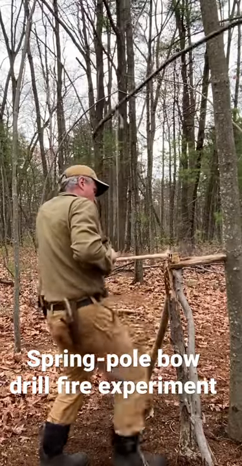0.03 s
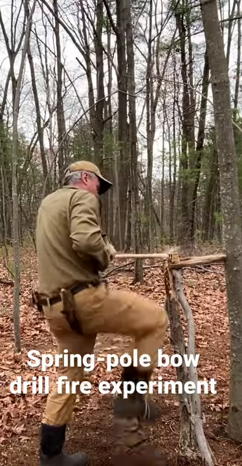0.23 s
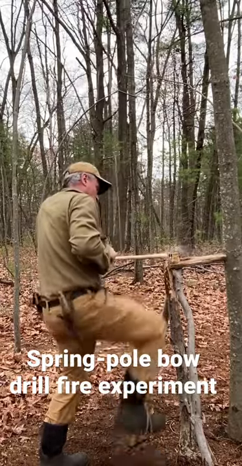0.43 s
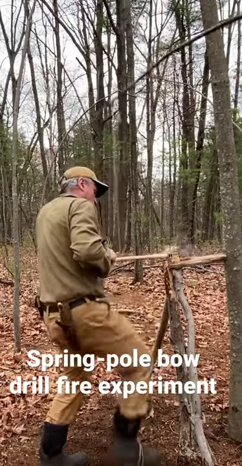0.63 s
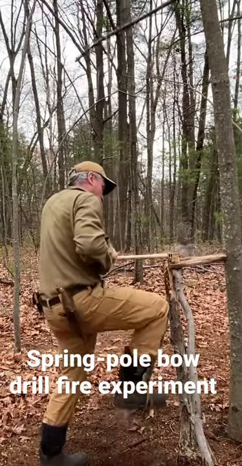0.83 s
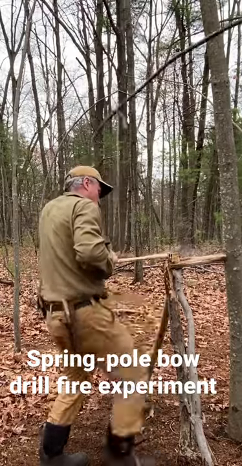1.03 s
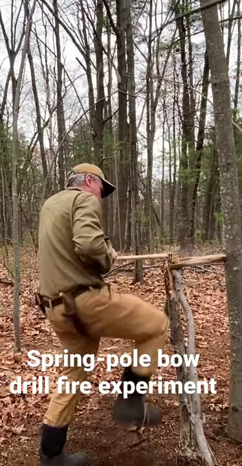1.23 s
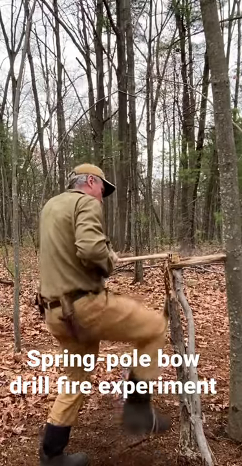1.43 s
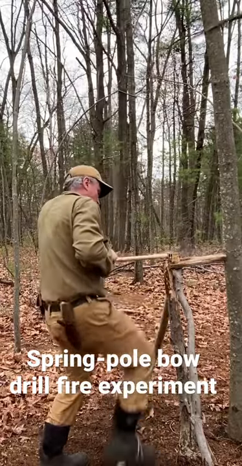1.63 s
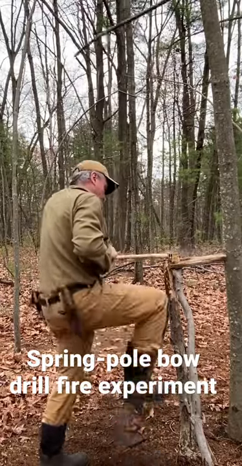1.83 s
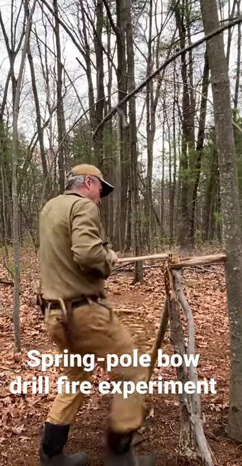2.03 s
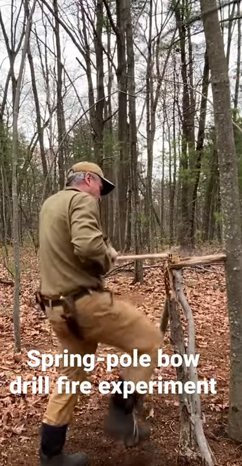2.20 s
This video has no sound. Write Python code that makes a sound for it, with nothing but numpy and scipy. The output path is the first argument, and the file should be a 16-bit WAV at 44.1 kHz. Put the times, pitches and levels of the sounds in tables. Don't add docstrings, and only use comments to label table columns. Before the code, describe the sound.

Wooden squeaks from a foot-driven spindle: two rough, chirping ones at 0.1-0.22 and 0.37-0.48 s, then loud, higher down-stroke squeaks near 0.93, 1.44 and 1.94 s, with weaker return squeaks near 0.66, 1.15, 1.65 and 2.16 s. Dry rubbing and sharp cord ticks accompany them; dull boot thuds fall near 0.47, 0.96, 1.47 and 1.98 s. Underneath, a sagging distant hum, low rumble and swelling traffic wash; slight woodland scatter.

```python
import sys
import numpy as np
from scipy import signal
from scipy.fft import rfft, irfft
from scipy.io import wavfile
from scipy.ndimage import uniform_filter1d

SR = 44100
rng = np.random.default_rng(int(sys.argv[2]) if len(sys.argv) > 2 else 0)


def unload_wav(signal):
    wavfile.write(
        sys.argv[1],
        SR,
        np.round(np.clip(np.atleast_2d(signal).T, -1, 1) * 32767).astype(np.int16),
    )


def ratio(d):
    e = np.asarray(d, float) / 20
    return 10 ** e


N = 99886

# [f/Hz, phase/rad]
PORTS = [(7200, -.5), (8800, -1.9), (9300, -3.2), (10400, -5.9), (11900, -6.9), (12900, -9.2),
         (14100, -10.1), (14800, -12.5)]


def read(points, hz):
    f, value = np.transpose(points)
    return np.interp(np.log(hz + 1), np.log(f + 1), value)


def curve(points, t):
    return np.interp(t, *np.transpose(points))


def evened(x):
    return x / np.sqrt(np.mean(x ** 2) + 1e-20)


def drift(n, seconds):
    k = max(round(seconds * SR), 2)
    smooth = uniform_filter1d(uniform_filter1d(rng.standard_normal(n), k), k)
    return smooth * np.sqrt(1.31 * k)


def add(mix, s, sound):
    part = mix[round(s * SR):][:len(sound)]
    part += sound[:len(part)]


def colour(x, points):
    hz = np.fft.rfftfreq(len(x), 1 / SR)
    gain = ratio(read(points, hz)) * (hz < points[-1][0] * 1.06)
    return irfft(rfft(x) * gain, len(x))


def hum():
    # [f/Hz, width/Hz, level/dB]
    tones = [
        (65.67, 18, -8.5),
        (132.1, 1.6, 0),
        (151.6, 7.4, -8),
        (186.7, 12, -12),
    ]
    # [t/s, share of the starting pitch]
    sag = [(0, 1.0), (.42, 1.0), (.8, .984), (1.3, .971), (1.7, .968), (2.26, .97)]
    # [t/s, level/dB]
    fade = [(0, -34), (.1, -31), (.3, -42), (.47, -35), (.65, -35.5), (.8, -50), (1.0, -38), (1.5, -37.5),
            (1.68, -40), (1.9, -35.5), (2.1, -42), (2.26, -47)]
    t, out = np.arange(N) / SR, np.zeros(N)
    turns = np.cumsum(curve(sag, t)) / SR
    for hz, width, db in tones:
        waver = 2.6 + drift(N, 0.31 / width) + 1j * drift(N, 0.1 / width)
        out += ratio(db) * evened((waver * np.exp(2j * np.pi * hz * turns)).real)
    out = out * ratio(curve(fade, t))
    return np.array([out * ratio(0.5), np.roll(out, -40) * ratio(0.5)])


def air(points, db, frame, patchy_db):
    # [f/Hz, correlation]
    same_curve = [(60, .98), (200, .95), (320, .6), (500, .45), (1100, .35), (1700, .1), (8600, .2),
                  (9200, .97)]
    # [f/Hz, phase/rad]
    lead = [(40, -.3), (90, -.5), (130, -.8), (250, -.85), (400, -1.3), (600, -2.3), (1300, -2.3)]
    # [f/Hz, left minus right/dB]
    tilt = [(60, 1.0), (240, 3), (950, -1), (3770, 2), (15000, -1)]
    hop, hz = frame // 4, np.fft.rfftfreq(frame, 1 / SR)
    a, b, c, d, patches = rng.standard_normal((N // hop + 6, len(hz), 5)).T
    patches = evened(uniform_filter1d(uniform_filter1d(patches, 12, 0), 12, 1))
    same = np.clip(read(same_curve, hz), -1, 1)[:, None]
    left, other = a + 1j * b, c + 1j * d
    phase = np.where(hz < 5000, read(lead, hz), read(PORTS, hz))[:, None]
    right = (same * left + np.sqrt(1 - same ** 2) * other) * np.exp(-1j * phase)
    z = np.array([left, right * ratio(-read(tilt, hz))[:, None]])
    inside = (hz >= points[0][0]) & (hz <= points[-1][0])
    z *= ratio(read(points, hz)[:, None] + patchy_db * patches) * inside[:, None]
    sound = signal.istft(z, nperseg=frame, noverlap=frame - hop)[1][:, :N]
    return ratio(db) * evened(sound)


def rumble():
    # [f/Hz, level/dB]
    low_spectrum = [(22, -62), (40, -28), (55, -2.5), (90, -1.5), (115, -11), (170, -9.5), (205, -19),
                    (300, -20)]
    return air(low_spectrum, -39, 4096, patchy_db=1.0)


def traffic_wash():
    # [f/Hz, level/dB]
    wash_spectrum = [(180, -91), (300, -9.5), (831, -1), (1440, -3), (1600, -4.5), (2080, -6),
                     (7550, -29.5), (15000, -59), (16300, -63)]
    # [t/s, level/dB]
    swell = [(0, -1), (.6, 0.5), (1.2, 0), (1.75, 1), (2.05, 1.5), (2.26, 3)]
    return ratio(curve(swell, np.arange(N) / SR)) * air(wash_spectrum, -36.5, 1024, patchy_db=1.9)


def rubbing():
    # [middle t/s, length/s, level/dB]
    strokes = [
        (0.132, .24, -63.5),
        (0.428, 0.19, -62.5),
        (0.662, 0.31, -67),
        (0.92, 0.16, -60.5),
        (1.152, 0.19, -65),
        (1.431, 0.18, -61),
        (1.63, 0.12, -63),
        (1.94, 0.14, -59.5),
        (2.15, 0.17, -63.5),
    ]
    # [f/Hz, level/dB]
    rub_spectrum = [(2000, -46), (5000, 0), (8300, -1.5), (9500, 5.5), (10800, -0.5), (13000, -5.5),
                    (15000, -9), (16000, -24)]
    t, speed = np.arange(N) / SR, np.zeros(N)
    for s, length, db in strokes:
        speed += ratio(db) * np.cos(np.pi * np.clip((t - s) / length, -.5, .5)) ** 1.28
    grit = rng.standard_normal(N) * ratio(2.8 * drift(N, 0.0025) + 0.5 * drift(N, 0.019))
    return speed * evened(colour(grit, rub_spectrum)) * 2.16


def cord_ticks():
    # [t/s, peak level/dB]
    tick_times = [(.0473, -46), (0.1143, -39.5), (0.251, -40), (0.2698, -50), (.3651, -48), (0.612, -35),
                  (0.6314, -51), (0.6792, -36), (.8545, -48), (0.939, -28.5), (1.0484, -36),
                  (1.0493, -22.5), (1.086, -37), (1.1348, -40), (1.1762, -33.5), (1.3483, -45),
                  (1.439, -32), (1.564, -27.5), (1.567, -29), (1.6047, -47), (1.6192, -42), (1.682, -36),
                  (1.685, -39), (1.8387, -45), (1.9091, -49), (1.927, -43), (2.0827, -51), (2.112, -31)]
    # [f/Hz, level/dB]
    tick_spectrum = [(3000, -30), (5000, -23), (7500, -24), (10800, -5), (13000, -11), (16000, -20)]
    length_s, tail_db, tail_t60_s = 0.0005, -19, .022
    ticks, t = np.zeros(N), np.arange(2048) / SR
    after = t - .004
    shape = np.exp(-(after / length_s) ** 2 * 4)
    shape = shape + ratio(tail_db - 60 * after / tail_t60_s) * (after > 0)
    for s, db in tick_times:
        burst = colour(rng.standard_normal(len(t)) * shape, tick_spectrum)
        add(ticks, s - .0030, ratio(db) * burst / abs(burst).max())
    return ticks


def boot_thuds():
    # [t/s, peak level/dB, f/Hz]
    thud_times = [
        (0.47, -36.5, 256),
        (0.963, -34, 272),
        (1.472, -39.5, 268),
        (1.975, -34, 273),
    ]
    push_s, pitch_drop = 0.0046, 0.16
    thuds = np.zeros(N)
    u = (np.arange(2048) / SR - .02) / push_s
    shape = np.exp(-u ** 2 / np.where(u < 0, .5, 2))
    for s, db, hz in thud_times:
        turns = np.cumsum(hz * (1 - pitch_drop * np.tanh(u / 2))) / SR + rng.random()
        add(thuds, s - .02, ratio(db) * shape * np.cos(2 * np.pi * turns))
    return thuds


def squeak(rows, half_db, pairs, rasp_db):
    # [f/Hz, level/dB]
    wood = [(520, 1.5), (1250, 4), (2600, 4.5), (3550, -11.5), (3960, -6.5), (4200, -17.5), (4800, -8.5),
            (5350, -27)]
    # [f/Hz, level/dB]
    rasp_spectrum = [(700, -14), (1800, 0), (3000, -3), (5000, -13), (8000, -30)]
    jitter, flutter_db, flutter_s, wander_rad = .016, 1.6, .003, .55
    board_hz, board_width_hz, board_db = 1950, 160, 4
    s, hz, level_db, bright, *weak = np.transpose(rows)
    t = np.arange(s[0], s[-1], 1 / SR)
    n = len(t)
    rate = np.interp(t, s, hz) * pairs
    half_db = half_db + sum(np.interp(t, s, db) for db in weak)
    turns = np.cumsum(rate * (1 + jitter * drift(n, 0.0014))) / SR
    out, power, chatter = np.zeros(n), 0, drift(n, flutter_s)
    for k in range(1, 15):
        f = k * rate
        size_db = read(wood, f) + np.interp(t, s, bright) * np.log2(f / 1800) + half_db * (k % 2)
        size_db = size_db + board_db * np.exp(-((f - board_hz) / board_width_hz) ** 2)
        size = ratio(size_db) * (f < 7400)
        power += size ** 2 / 2
        loose = np.sqrt(f / 1300)
        flutter = ratio(flutter_db * loose * (drift(n, flutter_s) + .5 * chatter - 0.13 * loose))
        wander = wander_rad * loose * drift(n, flutter_s * 2) + 6 * rng.random()
        out += size * flutter * np.cos(2 * np.pi * k * turns + wander)
    grit = rng.standard_normal(n) * np.exp(-(turns % 1) / 0.75)
    rasp = evened(colour(grit, rasp_spectrum)) * ratio(rasp_db + 2.5 * chatter)
    edge = np.clip(np.minimum(t - s[0], s[-1] - t) / 0.0015, 0, 1)
    return s[0], (out / np.sqrt(power) + rasp) * ratio(np.interp(t, s, level_db) - 3) * edge


def spindle_squeaks():
    # [t/s, pair rate f/Hz, level/dB, brightness/(dB per octave), alternation/dB]
    first = [
        [(.092, 562.7, -33.5, -8, 0), (.105, 538, -37.5, -4.5, 1), (.114, 506, -30, 6, -3),
         (.126, 476.5, -26.5, -7, -8), (.145, 502, -30, 1, 4), (.163, 511.4, -26.5, -4.5, 2),
         (.18, 554, -32, -9.5, 3), (.199, 576, -28.5, -2, 1), (.222, 597, -36, -4, 6)],
        [(.365, 572.6, -44, -2, -18), (.39, 587, -28, -3, -12), (.402, 582.6, -28.5, -1.5, -29),
         (.415, 624, -27, 2.5, 17), (.424, 653, -29.5, -1, 8), (.432, 664, -22.5, 2.5, 0),
         (.446, 640, -28, 0, 25), (.462, 668, -30, 2.5, -5), (.485, 670, -41.5, -12, -3)],
    ]
    # [t/s, slip rate f/Hz, level/dB, brightness/(dB per octave)]
    down = [
        [(.892, 1313, -29, -18), (.903, 1314, -29, 0), (.912, 1238, -22.5, 5.5), (.922, 1313, -26.5, -2),
         (.931, 1362, -20, 0.5), (.941, 1269, -26, 6.5), (.951, 1358, -22.5, -4), (.962, 1330, -24, -2),
         (.974, 1383, -45, -7)],
        [(1.403, 1377, -40, -3), (1.412, 1410, -28.5, -10), (1.416, 1358, -24, -14), (1.425, 1364, -23.5, -6),
         (1.434, 1389, -24, 0.5), (1.445, 1352, -26, -8), (1.455, 1405, -28, -1.5), (1.466, 1400, -37, -19),
         (1.475, 1390, -41, -10)],
        [(1.893, 1236, -42, -8), (1.902, 1253, -35, 11), (1.914, 1306, -26.5, -2), (1.927, 1378, -21.5, 3.5),
         (1.938, 1286, -24, -4), (1.953, 1333, -24, -1), (1.963, 1322, -27.5, 0.5), (1.974, 1370, -25, -6.5),
         (1.99, 1400, -46, -21)],
    ]
    # [t/s, slip rate f/Hz, level/dB, brightness/(dB per octave)]
    up = [
        [(.645, 1234, -41, -10), (.657, 1233, -27.5, -2), (.672, 1250, -53, 6)],
        [(1.124, 1308, -49, 3), (1.137, 1239, -30, 4), (1.153, 1204, -26.5, -2.5), (1.166, 1243, -35, 4),
         (1.174, 1260, -44, 12)],
        [(1.62, 1163, -37, -19), (1.633, 1190, -33, 4), (1.646, 1144, -24.5, 1.5), (1.656, 1168, -32.5, -3),
         (1.676, 1195, -31, -9.5), (1.7, 1220, -37, -6)],
        [(2.113, 1270, -34, 6), (2.117, 1182, -26, 5), (2.123, 1100, -26, 9), (2.14, 1182, -30.5, -3),
         (2.149, 1180, -36, 4)],
        [(2.149, 1176, -29, 3), (2.156, 1167, -23, 1.5), (2.17, 1156, -24.5, 0), (2.184, 1240, -33.5, -6)],
        [(2.184, 1293, -38, -5), (2.195, 1263, -32, 4), (2.212, 1340, -45, -2)],
    ]
    alternation = [-1.5, -41, -18]
    rasp_levels = [-15, -19, -20]
    out = np.zeros(N)
    for table, half_db, pairs, rasp_db in zip((first, down, up), alternation, (1, .5, .5), rasp_levels):
        for rows in table:
            add(out, *squeak(rows, half_db, pairs, rasp_db))
    return out


def trees(x):
    t60_s, t = .07, np.arange(6000) / SR
    taps = rng.choice([-1., 1.], (2, len(t))) * (rng.random((2, len(t))) < .03)
    taps = taps * ratio(-60 * t / t60_s) * (t > .002)
    taps = taps / np.linalg.norm(taps, axis=1)[:, None]
    return signal.fftconvolve(x[None], taps, axes=1)[:, :N]


def scene():
    pan_db = .4
    ticks = cord_ticks()
    rig = boot_thuds() + spindle_squeaks()
    dry_noise = ticks + rubbing()
    direct = rig + dry_noise
    late = irfft(rfft(direct) * np.exp(1j * read(PORTS, np.fft.rfftfreq(N, 1 / SR))), N)
    near = np.array([late * ratio(pan_db), direct * ratio(-pan_db)])
    near = near + ratio(-9) * trees(rig) + ratio(-14) * trees(dry_noise)
    return near + hum() + rumble() + traffic_wash()


def band_limit(x):
    return signal.sosfilt(signal.butter(12, 16430, fs=SR, output="sos"), x)


def record(dry):
    edge_hz = 15700
    edge = ratio(-40 * np.clip((np.fft.rfftfreq(N, 1 / SR) - edge_hz) / 500, 0, 2))
    mix = irfft(rfft(dry) * edge, N)
    return band_limit(mix)


dry = scene()
out = record(dry)
unload_wav(out)
```